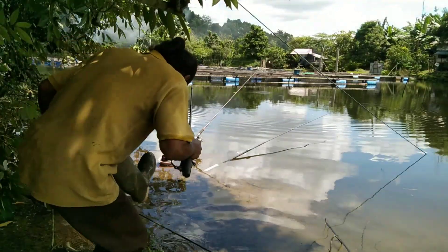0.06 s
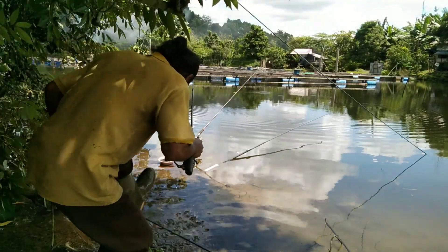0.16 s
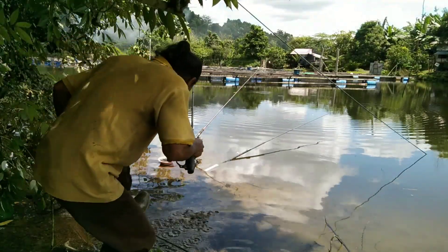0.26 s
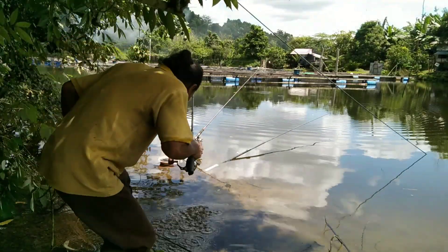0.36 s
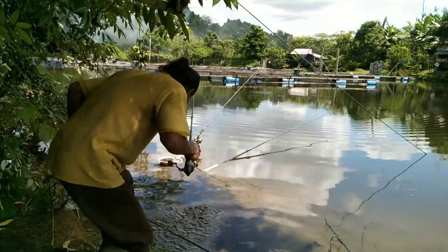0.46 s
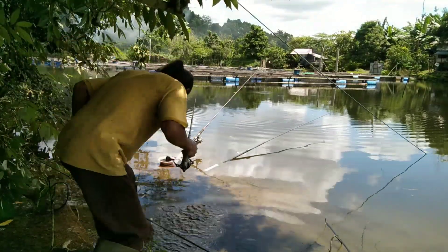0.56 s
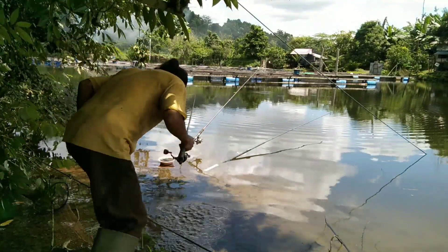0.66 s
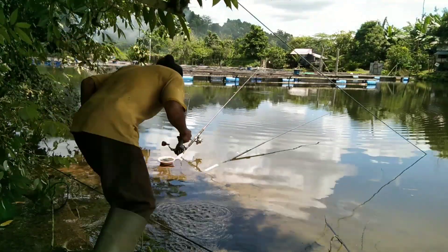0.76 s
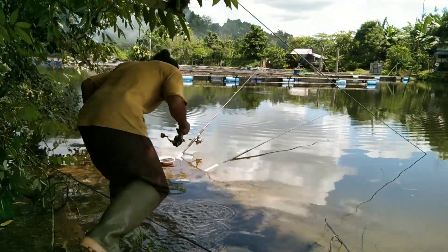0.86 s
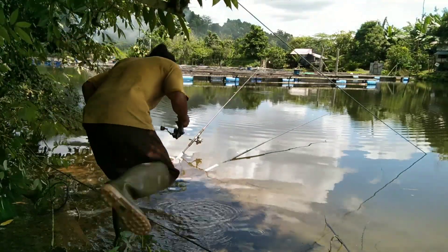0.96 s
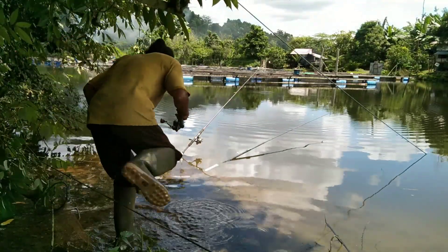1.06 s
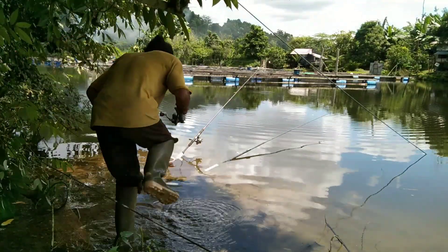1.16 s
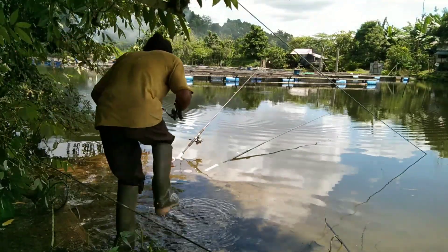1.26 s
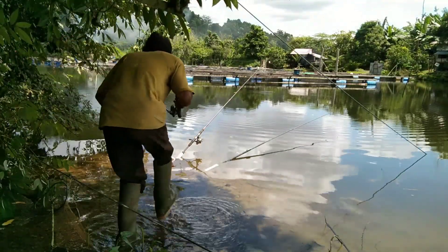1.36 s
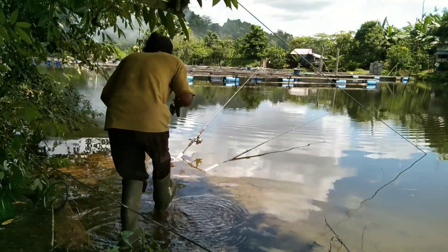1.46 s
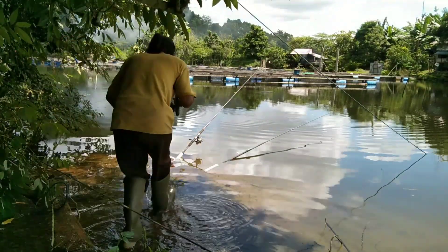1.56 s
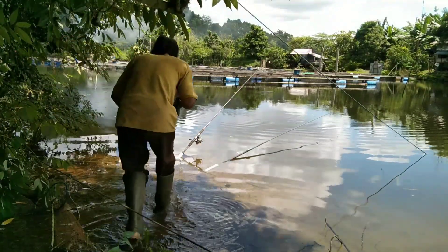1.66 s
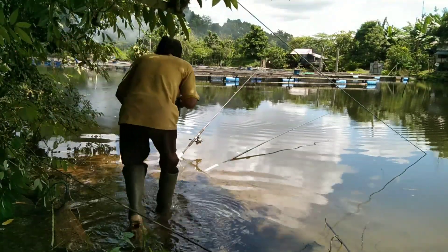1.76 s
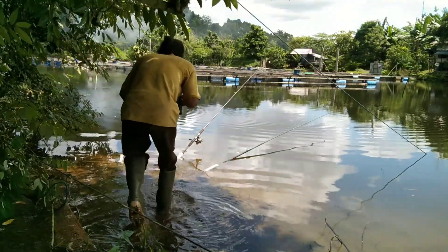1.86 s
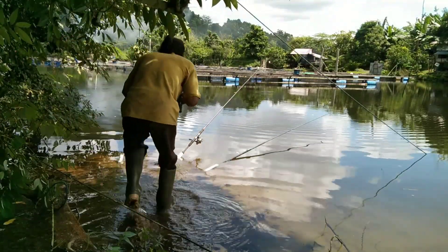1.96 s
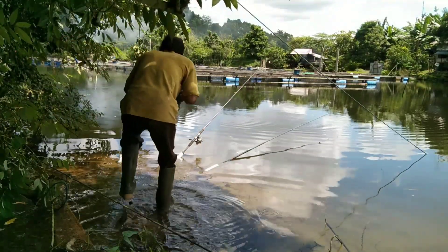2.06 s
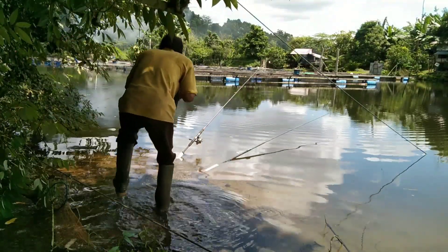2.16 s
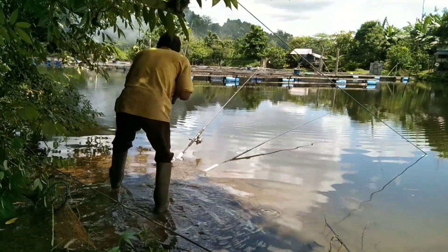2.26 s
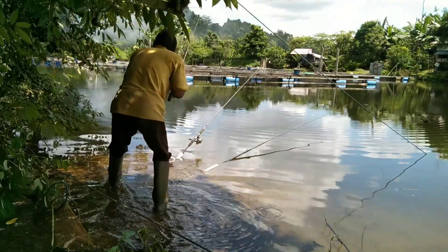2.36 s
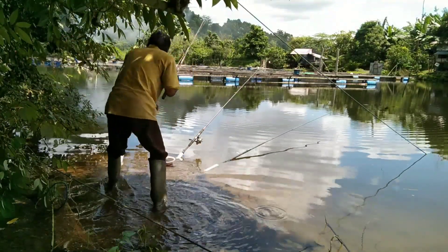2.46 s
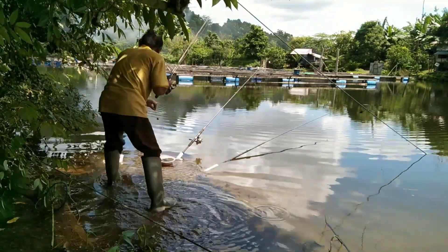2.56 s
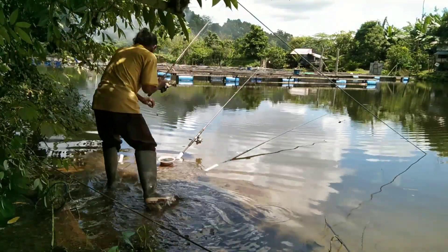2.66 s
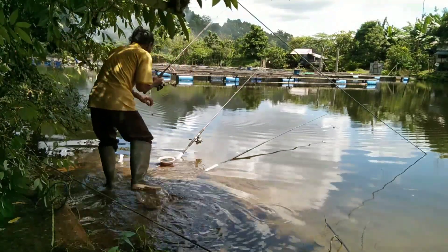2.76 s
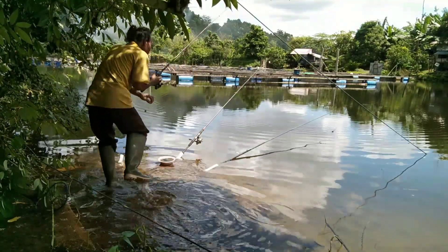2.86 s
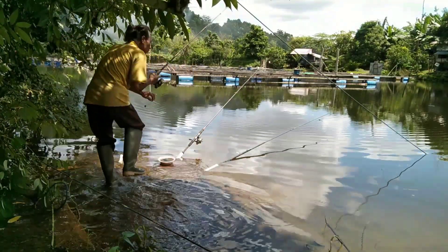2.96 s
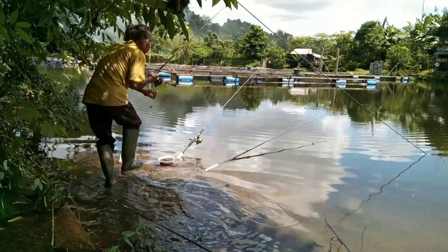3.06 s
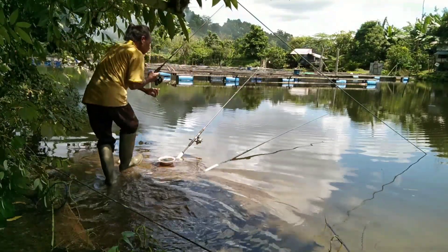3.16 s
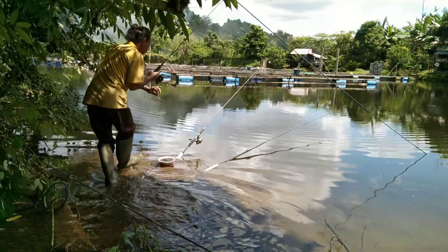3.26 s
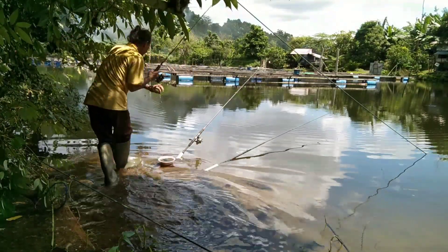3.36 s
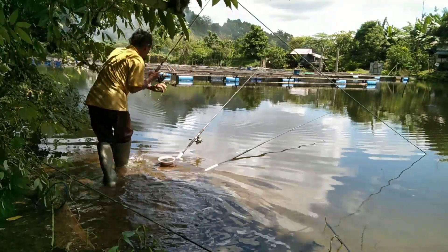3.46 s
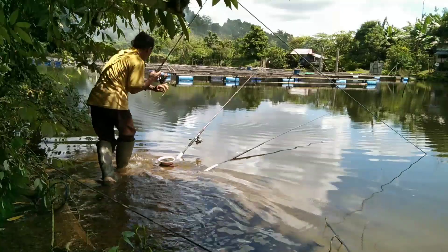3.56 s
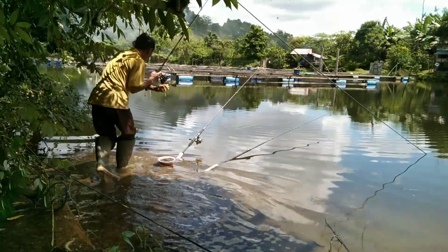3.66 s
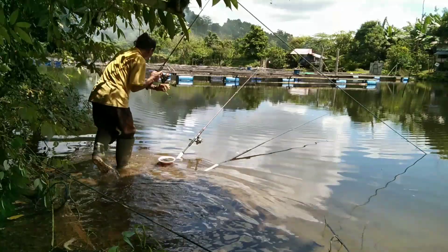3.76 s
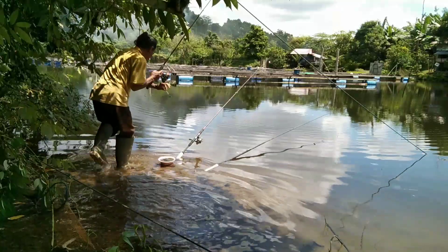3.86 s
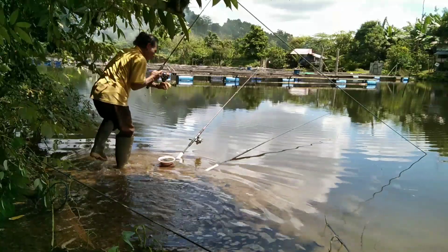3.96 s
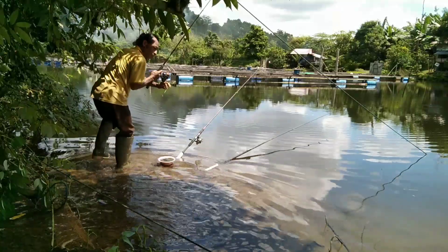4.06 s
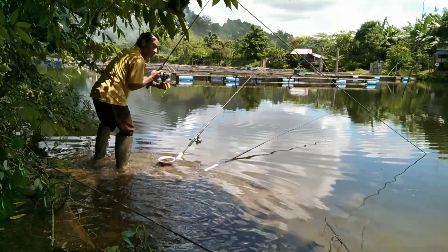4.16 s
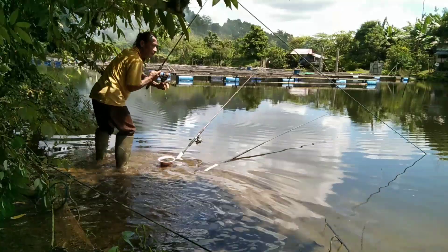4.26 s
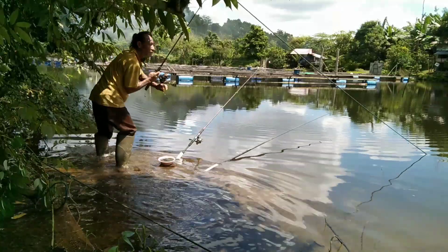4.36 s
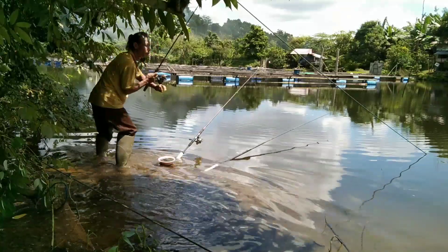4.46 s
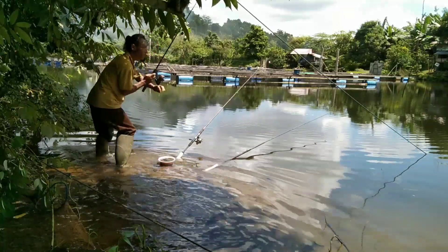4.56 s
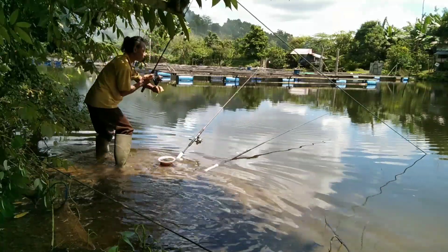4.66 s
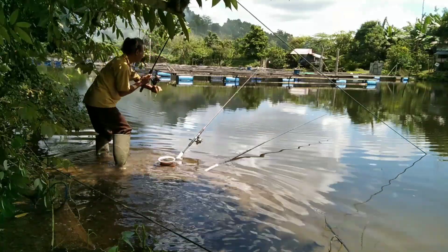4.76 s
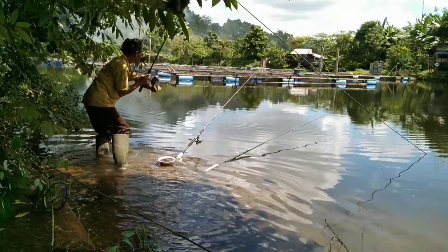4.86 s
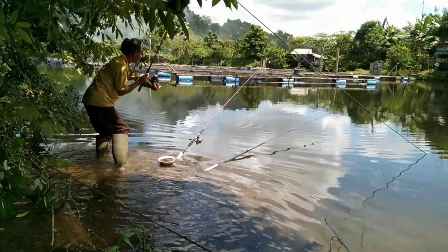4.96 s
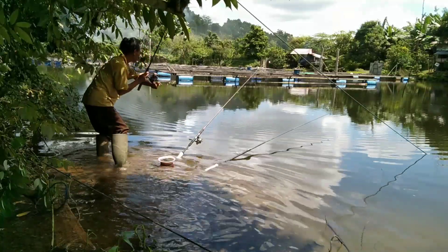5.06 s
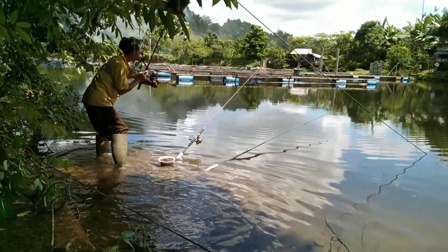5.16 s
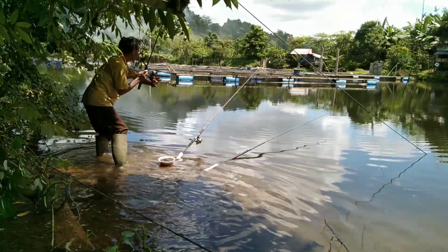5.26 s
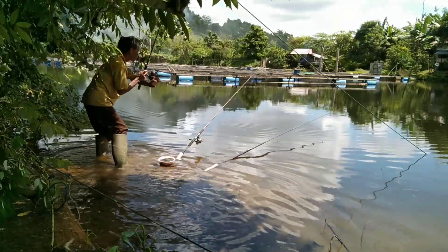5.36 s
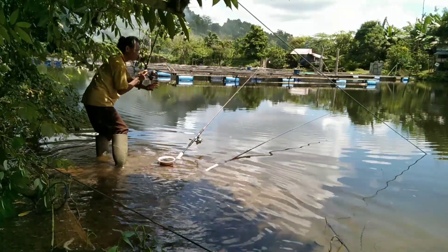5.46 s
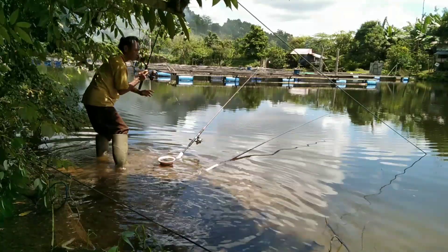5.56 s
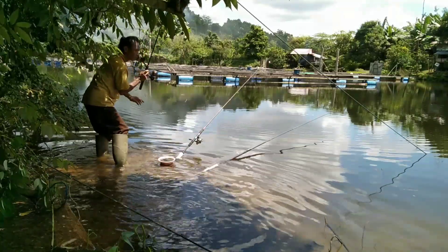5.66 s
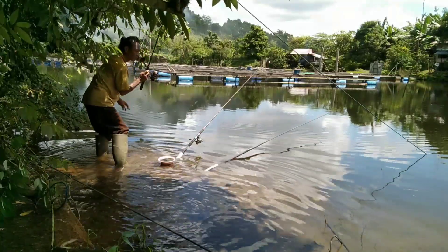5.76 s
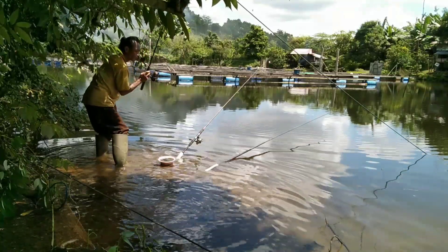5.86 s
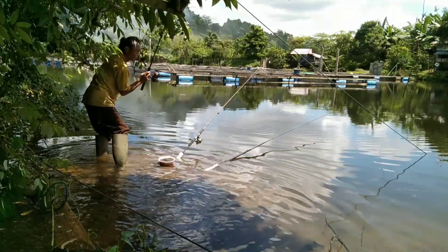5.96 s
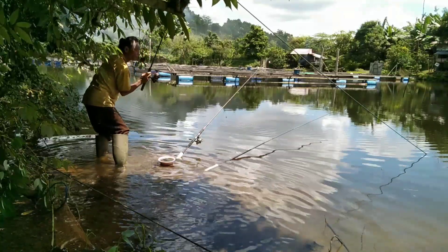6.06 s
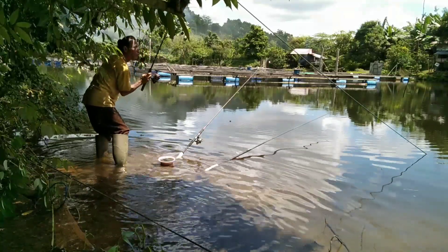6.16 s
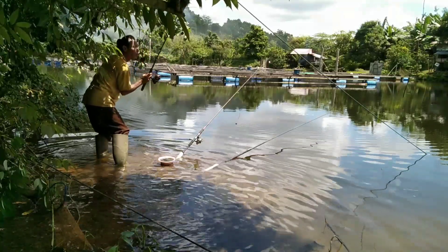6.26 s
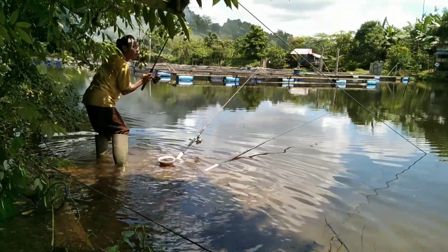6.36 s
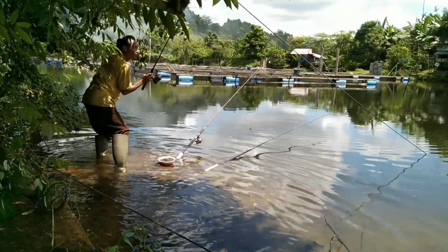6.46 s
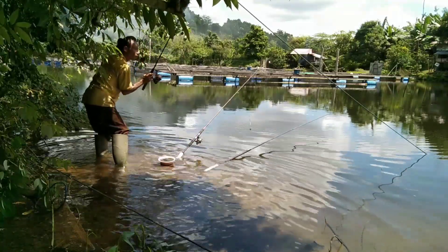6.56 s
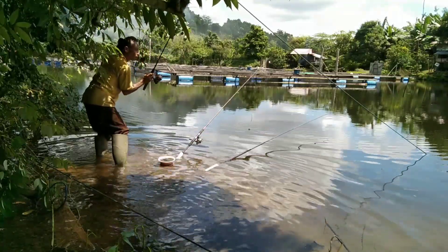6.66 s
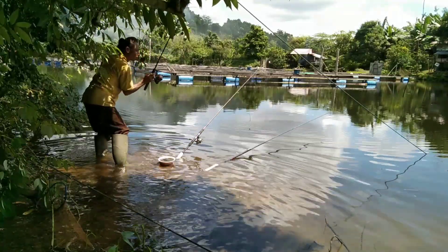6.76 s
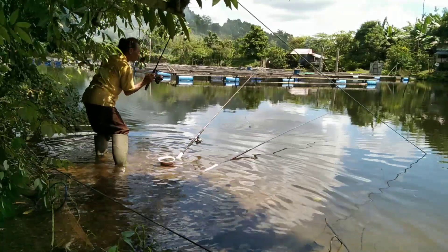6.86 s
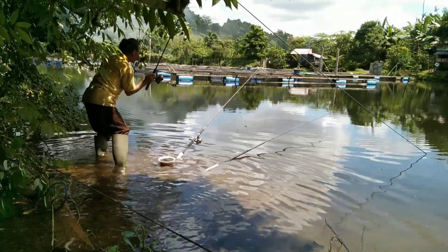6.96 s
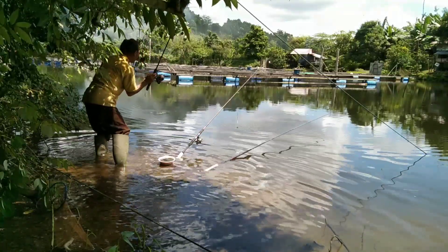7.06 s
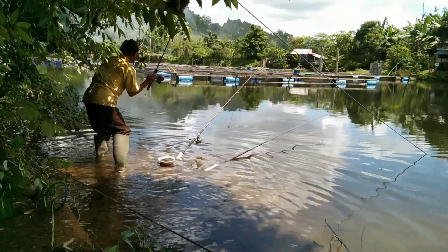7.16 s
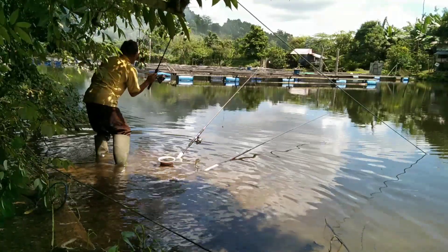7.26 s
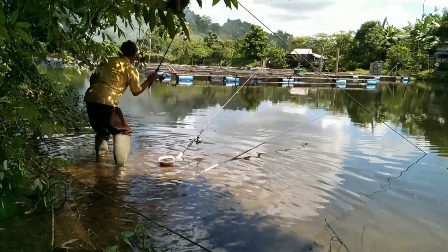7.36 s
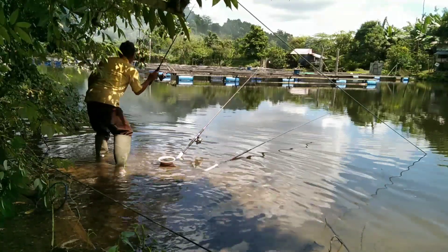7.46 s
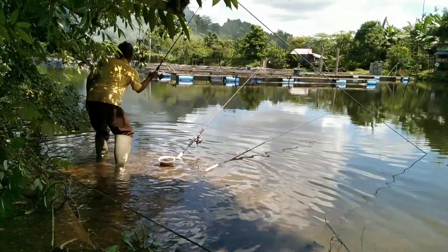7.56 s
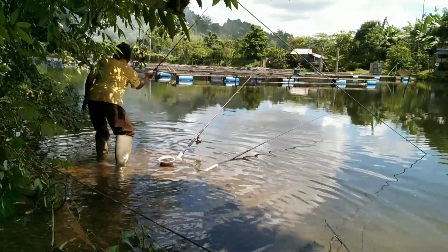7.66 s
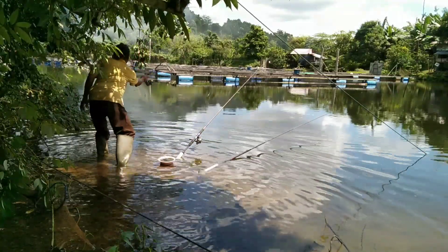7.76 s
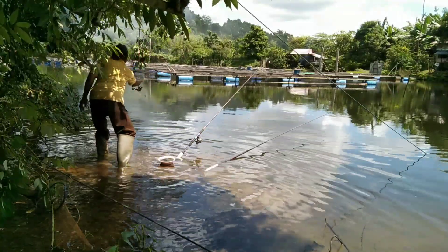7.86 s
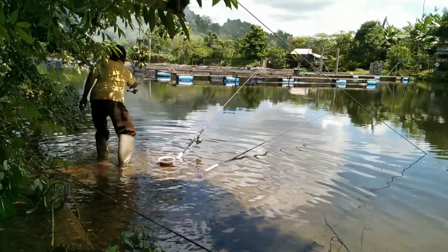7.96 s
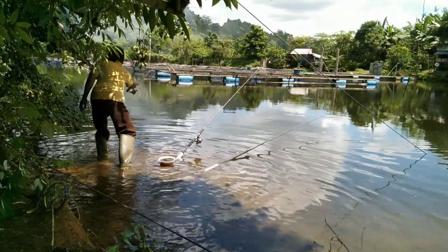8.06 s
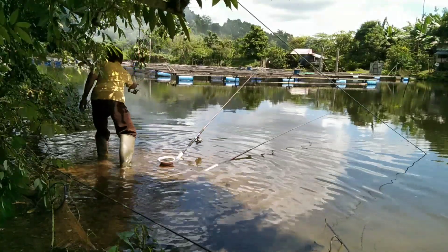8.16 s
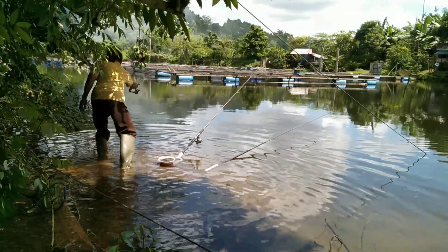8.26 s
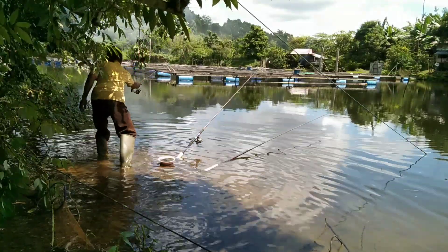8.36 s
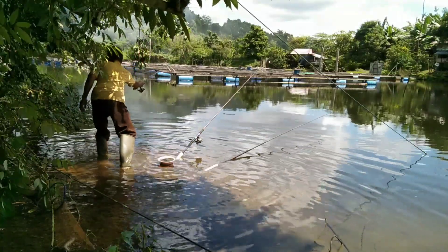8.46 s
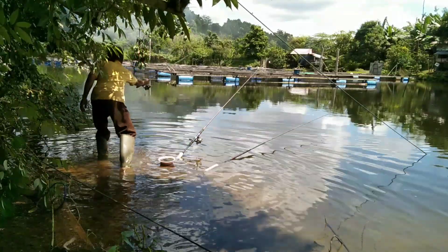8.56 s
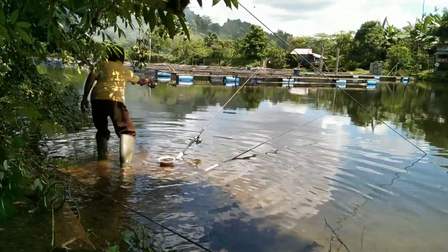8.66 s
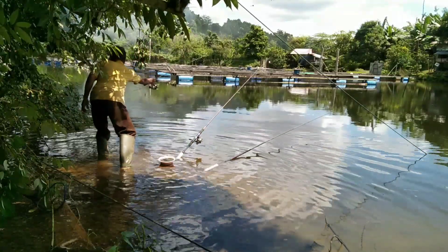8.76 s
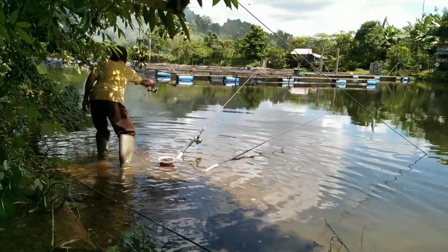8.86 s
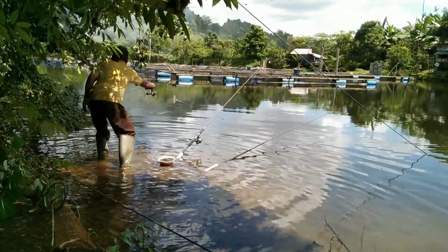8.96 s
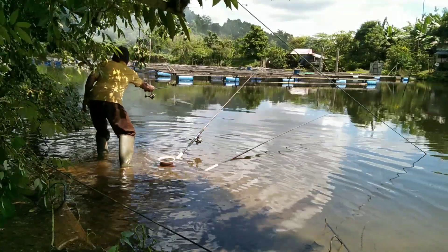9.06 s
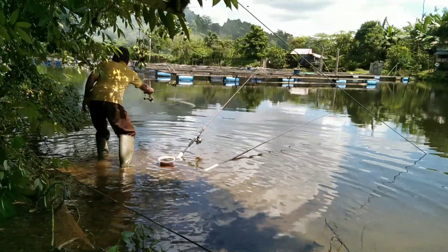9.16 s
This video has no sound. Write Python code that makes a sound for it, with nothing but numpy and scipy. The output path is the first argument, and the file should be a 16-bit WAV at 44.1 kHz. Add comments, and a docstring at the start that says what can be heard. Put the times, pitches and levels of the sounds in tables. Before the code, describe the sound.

Close, wet bootsteps slosh through a shallow pond, with gurgling bubbles, sharp splashes, low plops and bright drips. They stop after about five seconds. A high, steady cicada drone with a fast trill runs throughout; then a pulsing insect buzz swells and cuts off. Birds whoop and whistle in the surrounding woods. Outdoor microphone on the bank, identical in both channels.

```python
"""At a shallow pond, an angler in rubber boots wades in, then stands and shifts his feet.
The water is made of bubbles (short ringing tones) and of spray and splashes (shaped noise).
Cicadas drone as streams of ringing clicks; an insect trills and another swells into a pulsing buzz,
both as gliding tones. Birds call in whistled pitch curves, over a murmur of noise and a thin, high
insect note. Both channels carry the same sound."""
import sys
import numpy as np
from scipy import signal
from scipy.fft import rfft, irfft, next_fast_len
from scipy.io import wavfile
from scipy.ndimage import uniform_filter1d, map_coordinates

SR = 44100
rng = np.random.default_rng(int(sys.argv[2]) if len(sys.argv) > 2 else 0)


def generate_wav(signal):
    """Clip the signal to [-1, 1] and save it as 16-bit WAV at the path in sys.argv[1]."""
    frames = np.transpose(np.atleast_2d(signal))
    scaled = np.clip(frames, -1, 1) * 32767
    pcm = np.round(scaled).astype(np.int16)
    wavfile.write(sys.argv[1], SR, pcm)


N = 405279  # length of the scene in samples

# boots dragged through the water: (start [s], length [s], gurgle level [dB], spray level [dB])
BOOT_STRIDES = [(0, 0.016, -50, -54.5), (.255, 0.013, -51, -68), (0.437, 0.049, -49.5, -56.5),
                (0.628, 0.087, -56.5, -66), (0.878, 0.17, -47, -55), (1.153, 0.073, -51.5, -53.5),
                (1.5, 0.2, -59.5, -57), (1.901, 0.2, -46.5, -58), (2.184, 0.087, -62, -59),
                (2.486, 0.11, -56.5, -54), (2.74, 0.12, -44, -60), (2.874, .11, -50.5, -55.5),
                (3.282, 0.018, -69, -53), (3.387, .11, -50.5, -57), (3.715, 0.18, -49.5, -57.5),
                (3.933, 0.2, -51, -57.5), (4.16, .12, -52.5, -59), (4.352, 0.12, -52, -64.5),
                (4.625, .03, -47.5, -64)]
# colour of the spray: (frequency [Hz], level [dB per Hz])
SPRAY_COLOUR = [(80, -17), (200, -2.5), (500, -10), (1200, -1), (2500, 1.5), (5000, 6), (8000, 5.5),
                (11000, -8), (15500, -18.5)]
# echo from near leaves and bank: (frequency [Hz], time to die by 60 dB [s])
BANK_DECAY = [(200, 0.29), (1500, 0.23), (5000, 0.15), (12000, 0.32)]

STILL_S, SETTLE_S = 4.8, 0.27  # the angler comes to a stand; the water calms just before


def amp(db):
    """Turn decibels into a factor to multiply by."""
    return 10 ** (np.asarray(db) / 20)


def unit(x):
    """Scale a sound to an average strength (rms) of 1."""
    return x / np.sqrt(np.mean(x ** 2) + 1e-20)


def along(points, hz):
    """Read a curve of (frequency [Hz], value) points, with frequency on a log axis."""
    f, v = np.transpose(points)
    return np.interp(np.log(hz + 1), np.log(f + 1), v)


def curves(rows, at):
    """Read each column after the first at the given places in the first."""
    places, *columns = np.transpose(rows)
    return [np.interp(at, places, column) for column in columns]


def clock():
    """The time of each sample, in seconds."""
    return np.arange(N) / SR


def wobble(rate):
    """A smooth random curve through `rate` random points a second."""
    points = rng.standard_normal(int(N * rate / SR) + 4)
    return map_coordinates(points, [clock() * rate])


def filtered(x, response):
    """Make each frequency of x stronger or weaker, as response(hz) says."""
    size = next_fast_len(N + SR // 2)
    hz = np.fft.rfftfreq(size, 1 / SR)
    return irfft(rfft(x, size) * response(hz), size)[:N]


def coloured(x, spectrum):
    """Filter x through a curve of (frequency [Hz], level [dB]), then scale it to rms 1."""
    return unit(filtered(x, lambda hz: amp(along(spectrum, hz))))


def tone(hz):
    """A sine of rms 1 whose pitch follows a curve."""
    return np.sqrt(2) * np.sin(2 * np.pi * np.cumsum(hz) / SR)


def echo(x, decay):
    """Scattered reflections of x: a noise tail in which each frequency dies at its own speed."""
    hz, t, z = signal.stft(rng.standard_normal(SR), SR, nperseg=256)
    fade = amp(-60 * t / along(decay, hz)[:, None])
    tail = signal.istft(z * fade, SR, nperseg=256)[1]
    late = tail * (np.arange(len(tail)) > SR // 300)  # nothing returns in the first 1/300 s
    return unit(signal.fftconvolve(x, late)[:N]) * np.std(x)


def wading():
    """Boots stir the water, throw splashes, trap air and shed drops; the bank echoes it all."""
    water = stirred_water() + splashes() + plops_and_drops()
    return water + amp(-10.5) * echo(water, BANK_DECAY)


def stirred_water():
    """Dragged boots churn up low gurgling bubbles, small fizzing ones and a noisy wash of spray."""
    _, _, gurgle_db, spray_db = np.transpose(BOOT_STRIDES)
    # the first fade is the water settling; the weak trail is lapping ripples, or water running off
    stirred = churn(gurgle_db, t60=0.3, trail_db=-7.5, trail_t60=1.0)
    sprayed = churn(spray_db, t60=0.3, trail_db=-6, trail_t60=3.5)
    gurgling = froth(count=1400, low_hz=563, high_hz=1843, cycles=5.94, spread_db=25, size=2000)
    fizzing = froth(count=2400, low_hz=1600, high_hz=7000, cycles=3, spread_db=32, size=500)
    gurgle = stirred * amp(-4.5) * gurgling
    fizz = sprayed * amp(1) * fizzing
    flicker = amp(3.4 * wobble(400))
    wash = sprayed * amp(4.5) * coloured(rng.standard_normal(N) * flicker, SPRAY_COLOUR)
    moving = np.clip((STILL_S - clock()) / SETTLE_S, 0, 1)
    return moving * (gurgle + fizz + wash)


def churn(levels_db, t60, trail_db, trail_t60):
    """Strength of the stirred water: each stride builds up, holds, dies and leaves a weak trail."""
    push_s = 0.023  # the build-up, which is complete at the start of the stride
    t, power = clock()[::50], 0
    for (start, length, *_), db in zip(BOOT_STRIDES, levels_db):
        push = np.clip((t - start) / push_s + 1, 0, 1) ** 2
        after = np.maximum(t - start - length, 0)
        settling = amp(db - 60 * after / t60)
        trail = amp(db + trail_db - 60 * after / trail_t60)
        power = power + (push * np.maximum(settling, trail)) ** 2
    return np.interp(clock(), t, np.sqrt(power))


def froth(count, low_hz, high_hz, cycles, spread_db, size):
    """A swarm of bubbles at random times, pitches and levels, with rms 1 over the wading."""
    when, pitch, level = rng.random((count, 3)).T
    hz = low_hz * (high_hz / low_hz) ** pitch
    swarm = rings(when * STILL_S, hz, spread_db * level, cycles, 0.103, size)
    return unit(swarm) * np.sqrt(STILL_S * SR / N)


def rings(s, hz, db, cycles, glide, size):
    """Bubbles: damped sines that last some cycles and rise in pitch as they near the surface."""
    t = np.arange(size) / SR
    age = t * hz[:, None] / cycles
    swing = np.sin(2 * np.pi * cycles * age * (1 + glide * age / 2))
    wave = swing * np.exp(-age) * (1 - np.exp(-8 * age))  # a quick onset, then a decay
    where = np.round(np.abs(s) * SR).astype(int)[:, None] + np.arange(size)
    return np.bincount(where.ravel(), (amp(db)[:, None] * wave).ravel(), N)[:N]


def splashes():
    """Each splash is a rush of tiny impacts: bright when thrown, dull when the boot only pushes."""
    # sheets of water thrown up or landing:
    # (time [s], level [dB], rise [s], time to die by 60 dB [s], share of dull slosh [0-1])
    sheets = [(0.496, -36, 0.0092, 0.22, 0.06), (0.691, -42, 0.0029, 0.13, 0.1),
              (0.864, -38.5, 0.0011, 0.036, .1), (.885, -44.5, 0.027, 0.29, 0.06),
              (1.059, -38, 0.011, 0.064, 0.17), (1.175, -48, 0.0096, 0.048, 0.2),
              (1.201, -44.5, .001, 0.14, 0.16), (1.491, -33.5, 0.0029, 0.12, 0),
              (1.599, -46, 0.0046, 0.2, 0.33), (2.117, -40.5, 0.0071, 0.18, 0), (2.34, -43, 0.004, 0.3, 0),
              (2.528, -29.5, 0.0036, 0.035, 0.1), (2.792, -37.5, 0.009, 0.12, 0.1),
              (2.905, -43.5, 0.006, 0.072, 0.8), (3.414, -43.5, 0.0036, 0.12, 0.13),
              (3.467, -42, 0.0065, 0.091, 0.3), (3.875, -58, 0.012, 0.098, 0.8),
              (4.039, -47.5, 0.0089, 0.4, 0.4), (4.217, -36.5, 0.0082, 0.29, 0),
              (4.424, -41, 0.02, 0.19, 0.3), (4.66, -49.5, 0.011, 0.36, 0.28), (5.76, -54, 0.032, 0.86, 1),
              (8.446, -57, 0.0052, 0.52, 1), (9.006, -53, 0.004, 0.27, .5)]
    # colour of the dull slosh: (frequency [Hz], level [dB per Hz])
    slosh_colour = [(80, -11), (200, -9), (400, 11.5), (1000, 0.5), (2500, 4.5), (5000, 2), (9000, -30),
                    (15500, -73)]
    t = clock()
    patter = rng.standard_normal(N) * amp(1.75 * wobble(900))
    bright, dull = coloured(patter, SPRAY_COLOUR), coloured(patter, slosh_colour)
    splash = np.zeros(N)
    for s, db, rise, t60, slosh in sheets:
        on = np.abs(t - s) < .5
        decay_db = -60 * np.maximum(t[on] - s, 0) / t60
        rise_db = -10 * np.clip((s - t[on]) / rise, 0, 20)  # 10 dB for each rise time
        mix = bright[on] + np.clip(slosh, 0, 1) * (dull[on] - bright[on])
        splash[on] += amp(db + decay_db + rise_db) * mix
    return splash


def plops_and_drops():
    """Air pockets closing around the boots ring low; drops smacking the surface ring high."""
    # large air pockets: (time [s], pitch [Hz], level before the common gain [dB])
    air_pockets = [(.448, 580, -37.5), (0.451, 850, -38), (.47, 317, -44.5), (.485, 1000, -34.5),
                   (.495, 403, -42), (0.499, 213, -48.5), (.635, 430, -46), (0.886, 1095, -33.5),
                   (.917, 884, -37), (.957, 2180, -26), (.96, 1830, -37), (.976, 657, -37),
                   (1.065, 1260, -37), (1.234, 510, -41), (1.837, 2010, -32.5), (1.953, 980, -37),
                   (1.971, 717, -38), (2.032, 496, -37.5), (2.064, 1310, -36), (2.119, 1240, -34.5),
                   (2.485, 1120, -40), (2.53, 478, -43.5), (2.776, 1030, -34.5), (2.792, 2200, -33),
                   (2.809, 920, -34), (3.466, 495, -44.5), (3.489, 370, -45), (3.733, 976, -36),
                   (3.815, 1184, -34), (3.862, 810, -39.5), (3.876, 616, -43), (3.947, 1275, -36),
                   (4.209, 680, -43.5), (4.25, 1220, -35.5), (4.395, 305, -48), (4.426, 244, -44.5),
                   (4.444, 285, -46), (4.643, 866, -43.5), (4.65, 1134, -42), (5.701, 437, -48.5),
                   (5.729, 251, -51), (5.756, 350, -51), (8.421, 361, -43.5), (8.447, 2180, -47),
                   (9.0, 1990, -42), (9.006, 1400, -42.5), (9.011, 965, -49)]
    # falling drops: (time [s], pitch [Hz], level before the common gain [dB])
    falling_drops = [(0.8666, 6600, -23.5), (.911, 3730, -25.5), (1.201, 6750, -25), (1.4904, 6560, -21),
                     (1.497, 5340, -20.5), (1.552, 3130, -31.5), (1.6362, 7360, -18.5),
                     (1.642, 2690, -16.5), (1.947, 2700, -39), (2.016, 2500, -38.5), (2.067, 7140, -23),
                     (2.387, 3900, -23), (2.508, 5240, -28), (2.529, 4900, -26), (2.905, 3860, -30.5),
                     (3.504, 3160, -38), (4.1437, 5440, -31.5), (4.195, 3940, -39), (4.2172, 7100, -20.5),
                     (4.217, 4560, -25), (4.224, 3800, -28.5), (4.289, 2900, -31), (4.32, 4223, -31.5),
                     (8.464, 4120, -38.5)]
    plops = amp(2.5) * rings(*np.transpose(air_pockets), cycles=3.38, glide=0.05, size=6000)
    drops = amp(6.5) * rings(*np.transpose(falling_drops), cycles=2.53, glide=0.018, size=500)
    return plops + drops


def cicadas(count=6):
    """Tymbals (drum-like ribs) click out of step; ringing and scattered, they merge into a drone."""
    # main band of the chorus: (frequency [Hz], level [dB per Hz])
    main_band = [(5200, -60.5), (5800, -25), (6200, -18), (6500, -7), (6750, 0.5), (7000, -1.5),
                 (7350, -8.5), (7780, -5), (7950, -7), (8350, -13.5), (8620, -20), (9600, -86.5)]
    # its higher band: (frequency [Hz], level [dB per Hz])
    high_band = [(11500, -65.5), (12800, -12), (13200, 4), (13650, 20.5), (14000, -7), (14400, -29),
                 (15500, -32)]
    chorus = np.zeros(N)
    for spread in rng.uniform(-1, 1, count):
        rate = 380 * amp(3 * spread + 1.5 * wobble(150))  # clicks a second
        ticks = np.diff(np.floor(np.cumsum(rate) / SR), prepend=0)
        clicks = ticks * rng.normal(0, 1, N)
        chorus += clicks + amp(0.5) * echo(clicks, BANK_DECAY)
    drone = coloured(chorus, main_band) + amp(-31.0) * coloured(chorus, high_band)
    return amp(-43.5 + 0.24 * wobble(30)) * drone


def triller():
    """An insect repeats a short upward chirp fourteen times a second; another holds a lower note."""
    # one chirp: (share of the cycle [0-1], pitch [Hz], relative level [dB])
    chirp = [(0, 7930, -56.5), (.2, 8174, -11), (.36, 8060, -4.5), (.5, 8107, 1), (.6, 8290, -1),
             (.7, 8356, 3), (.85, 8378, -3.5), (1, 8368, -57)]
    cycle = (clock() - .002) * 14.215 % 1
    hz, db = curves(chirp, cycle)
    strength = amp(db + 1.2 * wobble(25) + 2.0 * wobble(200))
    song = unit(strength * tone(hz + 10 * wobble(11) + 30 * wobble(300)))
    held = amp(-57.5 + 3.4 * wobble(27)) * tone(7758 + 25 * wobble(150))
    return amp(-52.0) * song + amp(-55.0) * echo(song, BANK_DECAY) + held


def buzzer():
    """Another insect swells in bursts of rapid strokes, each stroke falling in pitch."""
    height_db, depth_db = -55.5, 48  # the level it climbs towards, and how far below that it begins
    start_s, swell_s = 5.68, 0.84  # it swells quickly at first, then levels off
    stop_s, cut_s = 8.69, .04  # when it breaks off, and how fast
    t = clock()
    burst = (t - 7.997) / .1155 % 1  # place within a burst, 0-1
    stroke = np.cumsum(130 + 3 * wobble(15)) / SR % 1  # place within a stroke, about 130 a second
    level_db = height_db - depth_db * np.exp(np.minimum((start_s - t) / swell_s, 0))
    singing = np.clip(1 - (t - stop_s) / cut_s, 0, 1)
    # (share of the burst [0-1], level [dB])
    burst_db, = curves([(0, -16), (.2, -14), (.5, -4), (.75, 1), (.93, 1), (1, -16)], burst)
    strokes = unit(np.sin(np.pi * stroke) * tone(9600 - 850 * stroke + 60 * wobble(900)))
    song = singing * amp(level_db + burst_db) * strokes
    return song + amp(-7) * echo(song, BANK_DECAY)


def whooper():
    """A bird's low whoop: a pure tone that leaps up and falls back."""
    # one whoop: (time from its start [s], pitch [Hz], relative level [dB])
    whoop = [(-.01, 910, -28), (.005, 1060, -10.5), (.03, 1363, -7), (.05, 1640, 1.5), (.07, 1700, -9),
             (.09, 1526, 2), (.105, 1120, -13), (.12, 935, -22)]
    # when it is sung: (time [s], level [dB])
    whoop_times = [(-.08, -54), (1.822, -50.5), (2.279, -51.5), (4.331, -51), (4.782, -51.5), (7.041, -51),
                   (7.5, -51.5)]
    return bird(whoop, whoop_times, waver=0.0044, wet_db=-2.5)


def whistler():
    """A bird's high whistle: a quavering tone that leaps up, sinks and is held."""
    # one whistle: (time from its start [s], pitch [Hz], relative level [dB])
    whistle = [(-.03, 2900, -6), (-.018, 3450, -7), (-.004, 4500, -38), (.009, 4550, 1), (.045, 4520, -2),
               (.06, 4300, -20), (.08, 4020, -9), (.12, 3880, -4), (.24, 3820, -2), (.35, 3900, 0),
               (.39, 4080, -16)]
    # when it is sung: (time [s], level [dB])
    whistle_times = [(1.233, -54.5), (2.892, -55.5), (3.65, -55), (5.118, -52), (5.868, -53.5), (6.71, -52)]
    return bird(whistle, whistle_times, waver=.024, wet_db=-4)


def rasper():
    """A bird's short, rough call: a falling tone made hoarse by strong quavering."""
    # one call: (time from its start [s], pitch [Hz], relative level [dB])
    rasp = [(0, 5070, -17), (.015, 4835, -1), (.05, 4550, -14), (.08, 4170, -27)]
    # when it is sung: (time [s], level [dB])
    rasp_times = [(7.339, -69), (7.851, -63)]
    return bird(rasp, rasp_times, waver=0.068, wet_db=-1)


def piper():
    """A bird's faint piping: a nearly steady tone that steps up, then sinks."""
    # one piped phrase: (time from its start [s], pitch [Hz], relative level [dB])
    pipe = [(0, 1770, -36), (.06, 1770, -3.5), (.14, 1922, -3.5), (.23, 1940, -0.5), (.3, 1846, -8)]
    # when it is sung: (time [s], level [dB])
    pipe_times = [(1.658, -65), (5.559, -64.5)]
    return bird(pipe, pipe_times, waver=0.0025, wet_db=-10.5)


def bird(phrase, calls, waver, wet_db):
    """A whistled phrase with a fast quaver, repeated, with the woods ringing after it."""
    # echo from the woods: (frequency [Hz], time to die by 60 dB [s])
    woods_decay = [(500, 1.8), (1600, 1.85), (4000, 1.15), (9000, 0.2)]
    song = np.zeros(N)
    quaver = 1 + waver * wobble(260)
    for s, db in calls:
        t = clock() - s
        on = (t > phrase[0][0]) & (t < phrase[-1][0])
        hz, shape_db = curves(phrase, t[on])
        song[on] += amp(db + shape_db) * tone(hz * quaver[on])
    direct = amp(-3.0 + 2.7 * wobble(45)) * song
    return direct + echo(song, BANK_DECAY) + amp(wet_db) * echo(song, woods_decay)


def high_insect():
    """A rough note near the top of hearing: a jittery tone that fades away."""
    fade_s, fade_db_per_s = 2.4, 27
    level_db = -67 - fade_db_per_s * np.maximum(clock() - fade_s, 0)
    return amp(level_db) * unit(amp(3.9 * wobble(300)) * tone(13050 + 260 * wobble(1200)))


def pond_air():
    """The far-off murmur of wind, water and foliage: patchy noise with a slowly drifting level."""
    # colour of the murmur: (frequency [Hz], level [dB per Hz])
    murmur = [(20, -20.5), (40, -19.5), (70, 4.5), (115, 5.5), (200, 1.5), (400, 0.5), (650, -2),
              (900, -14.5), (1400, -19), (2000, -14.5), (2700, -2.5), (4000, -7.5), (5500, -8), (9000, -38),
              (11000, -63)]
    breeze = patchy(depth_db=3.3)
    return amp(-63.0 + 0.9 * wobble(2.837)) * coloured(breeze, murmur)


def patchy(depth_db):
    """Noise whose strength drifts in patches of time and pitch; the bass stays even."""
    hz, _, z = signal.stft(rng.standard_normal(N), SR, nperseg=512)
    across_pitch = uniform_filter1d(rng.standard_normal(z.shape), size=4, axis=0)
    field = unit(uniform_filter1d(across_pitch, size=32, axis=1))  # smoothed along time as well
    gain = amp(depth_db * field * (hz[:, None] > 700))
    return signal.istft(z * gain, nperseg=512)[1][:N]


def scene():
    """Water, insects and birds over the quiet air of the pond, alike in both channels."""
    insects = cicadas() + triller() + buzzer() + high_insect()
    birds = whooper() + whistler() + rasper() + piper()
    mono = wading() + insects + birds + pond_air()
    return np.array([mono, mono])


def record(dry):
    """Keep only what lies below a sharp upper limit in frequency."""
    top_hz = 15600
    return np.array([filtered(channel, lambda hz: hz < top_hz) for channel in dry])


dry = scene()
out = record(dry)
generate_wav(out)
```